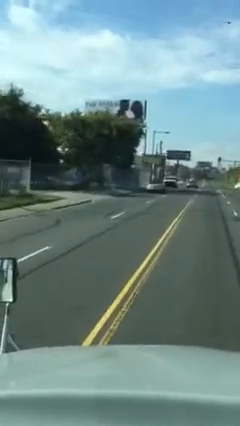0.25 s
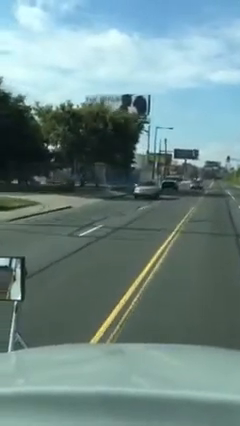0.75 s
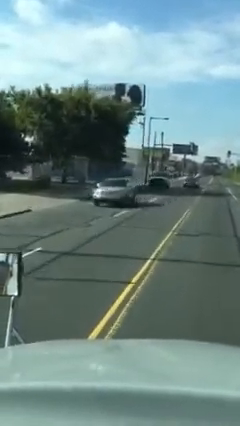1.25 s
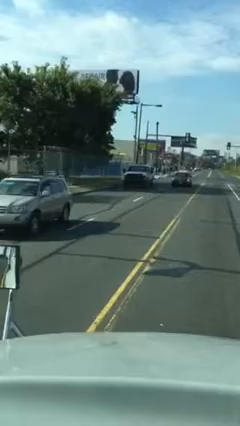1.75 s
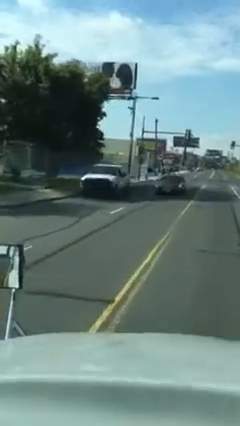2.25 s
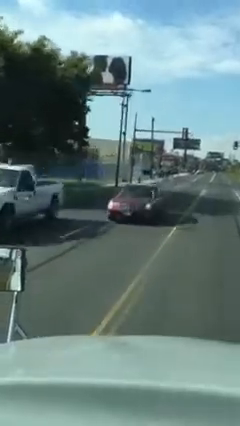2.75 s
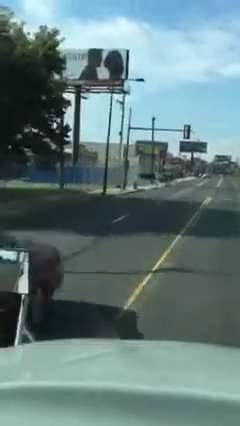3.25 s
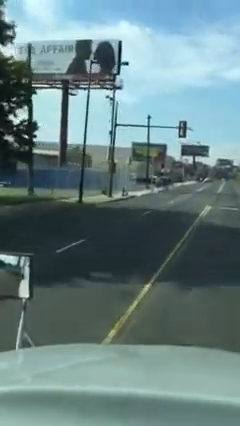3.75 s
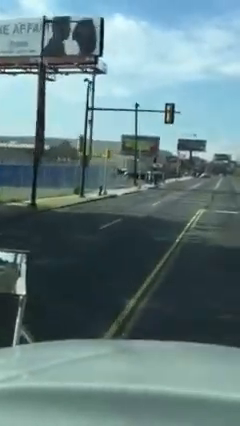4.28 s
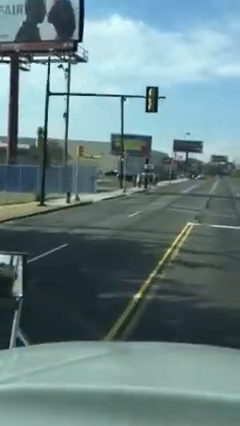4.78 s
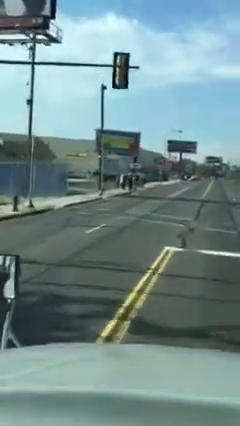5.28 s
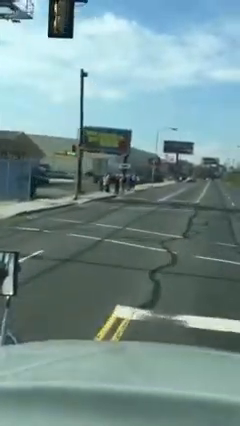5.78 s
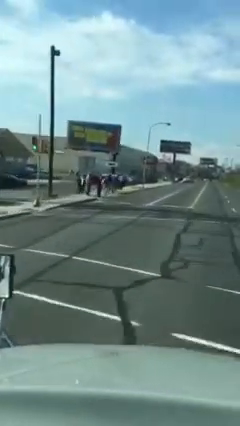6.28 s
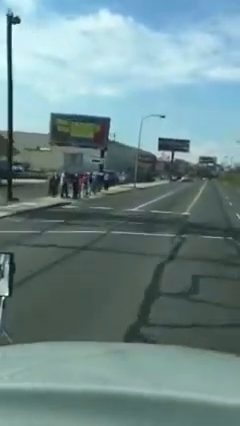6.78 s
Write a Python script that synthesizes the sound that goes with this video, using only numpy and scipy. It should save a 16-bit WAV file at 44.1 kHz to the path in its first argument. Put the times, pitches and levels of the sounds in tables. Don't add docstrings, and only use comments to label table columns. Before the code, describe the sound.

A microphone in the cab picks up a throbbing low rumble, engine hum and irregular dull thuds from the road. A few passing cars bring short bright whooshes and tyre hum, then the outside quiets, with faint whistles and chirps. Finally a single-tone air horn starts with a rasp, drops quickly onto its pitch and blares steadily, buzzing and shimmering as buildings and poles reflect it, still sounding at the cut-off.

```python
import sys
import numpy as np
from scipy import signal
from scipy.fft import rfft, irfft, next_fast_len
from scipy.io import wavfile

SR = 44100
rng = np.random.default_rng(int(sys.argv[2]) if len(sys.argv) > 2 else 0)


def gain_from_decibels(decibels):
    exponent = np.asarray(decibels, float) / 20
    return 10 ** exponent


def generate_wav(signal):
    frames = np.transpose(np.atleast_2d(signal))
    scaled = np.clip(frames, -1, 1) * 32767
    pcm = np.round(scaled).astype(np.int16)
    wavfile.write(sys.argv[1], SR, pcm)


N = 310023

# time in seconds, level in dB over the usual.
NEARNESS = [(0.0, -1.5), (0.2, -2.5), (1.4, 0), (2.3, 2), (2.55, 7.5), (2.8, 3.5), (2.95, 5), (3.35, 2),
            (3.58, 10.5), (3.75, 5), (4.1, -3.5), (4.35, -5), (4.65, -2.8), (5.45, -2)]
# time in seconds, level in dB over the usual.
SHAKING = [(0.0, -0.5), (0.2, 0), (0.6, -1), (1.2, 0), (1.9, 0), (2.5, -3), (2.9, 4.5), (3.15, -0.5),
           (3.5, -1), (3.9, -0.5), (4.5, -0.5), (5.05, -0.5), (5.4, 3), (5.6, -2), (6.1, -2), (6.7, -2.5),
           (7.03, -0.5)]
# frequency in Hz, density in dB per Hz.
BODY = [(13, -40), (22, -13), (54, -6), (75, -0.5), (105, -7.5), (140, -29), (230, -120)]
CAB = [(56, -33), (95, -14.5), (103, -5), (123, -2), (140, -1), (177, -6.5), (210, -12), (248, -12),
       (306, -10), (360, -22), (470, -53.5), (790, -120)]
TYRES = [(200, -33), (340, -13), (416, -6.5), (450, -10.5), (550, -0.5), (595, -6.5), (728, -7), (794, -7),
         (926, -8), (1260, -14), (1440, -10), (1570, -15.5), (2040, -15.5), (2520, -20.5), (3400, -29),
         (4420, -42.5), (7480, -120)]
WIND = [(1880, -40), (3200, -5), (3440, 1.5), (4910, -6.5), (6510, -8.5), (7420, -16.5), (9160, -15.5),
        (10500, -24.5), (11400, -24), (15400, -35)]
# frequency in Hz, density in dB per Hz.
MIC_HISS = [(8000, -12), (11000, 0), (15500, -3)]
# time in seconds, sixth crank order in Hz, its level in dB.
ENGINE = [(0, 136, -30.5), (1.5, 135, -32.5), (3.0, 134, -30), (4.2, 132, -31), (5.4, 126, -32),
          (7.03, 124, -31.5)]
# multiple of crank speed, level in dB.
CRANK_ORDERS = [(2, -5.5), (3, -8.5), (4, -9.5), (5, -8), (6, -0.5), (7.5, -6.5), (12, -9.5)]
# centre in Hz, width in Hz, level in dB at first,
# level in dB once the traffic is past.
WHISTLES = [
    (2000, 70, -55, -55),
    (4450, 220, -76, -68),
    (5550, 110, -86, -76),
    (6700, 160, -86, -78),
]
WHISTLES_GROW_S = (3.8, 4)
# time in seconds, peak in dB, ringing in Hz.
JOLTS = [(0.151, -25, 68), (0.85, -19.5, 137), (1.17, -21, 72), (1.391, -23, 141), (1.613, -19, 135),
         (2.186, -18, 135), (2.461, -16.5, 134), (2.539, -25, 72), (2.718, -23, 69), (2.74, -21, 140),
         (1.8, -26, 145), (2.861, -18, 134), (3.72, -22, 71), (3.794, -15, 127), (4.23, -21, 73),
         (4.745, -14.5, 131), (5.03, -18.5, 68.5), (5.329, -18.5, 75), (6.018, -23, 127), (6.711, -26, 86)]
# start in seconds, pitch in Hz, length in seconds, level in dB.
SQUEAKS = [
    (3.687, 11200, .045, -66),
    (3.815, 11050, .045, -67),
    (4.015, 10700, .03, -76),
    (4.42, 6750, .03, -63),
    (4.415, 3420, .025, -46),
    (5.055, 4450, .025, -60),
    (4.86, 5560, .025, -65),
    (2.95, 6400, .02, -63),
    (1.56, 13800, .02, -76),
]
# time abreast in seconds, swish in dB, swish width in seconds, tyre hum in dB,
# hum lag in seconds.
PASSES = [
    (2.56, -59, 0.089, -41, .05),
    (2.95, -71, .05, -50.5, .05),
    (3.3, -71, 0.089, -52.5, .05),
    (3.54, -55, 0.068, -33, 0.09),
]
# frequency in Hz, density in dB per Hz.
SWISH = [(1800, -15.5), (3000, 1.5), (4500, -12), (7000, -3.5), (10000, -11.5), (13000, -11), (15600, -20)]
HUM = [(700, -27), (1000, -5), (1350, -1), (1650, -8.5), (2400, -28)]
# time in seconds, pitch above the note in percent, level in dB.
HORN = [
    (5.457, 2.2, -66),
    (5.464, 1.7, -30),
    (5.48, 1.0, -29),
    (5.497, .4, -23.5),
    (5.56, 0, -25.5),
    (6.0, 0, -24.5),
    (6.5, 0, -24.5),
    (7.03, 0, -26),
]
# multiple of the note, level in dB.
HORN_ORDERS = [(1, -3.5), (2, -2.5), (3, 1.5), (4, 2.5), (5, -4.5), (6, -13), (7, -13.5), (8, -16),
               (9, -17.5), (10, -17.5), (11, -20.5), (12, -24), (13, -22), (14, -19), (15, -25.5),
               (16, -19.5), (17, -24.5), (18, -29.5), (19, -30), (20, -33.5), (21, -30), (22, -35.5),
               (23, -33), (24, -32.5), (25, -43), (26, -48.5), (27, -33), (28, -38), (29, -33), (30, -45),
               (31, -37)]
# multiple of the note, level
# between swells in dB over its usual.
IN_CAB = [(4, -0.5), (5, -0.5), (6, -1.5), (7, -6.5), (8, 0.4), (9, -4), (10, -1.7), (11, -0.5), (14, -2.3),
          (16, -1.4)]
# time in seconds, multiple of the note,
# lift in dB, width in seconds.
SWELLS = [(5.5, 4, 2.5, 0.02), (11, 4, 19, 0.039), (6.09, 4, -6, 0.27), (7.6, 4, 4, 0.052),
          (6.66, 4, 2.5, .06), (7.0, 4, 0, 0.043), (5.55, 5, 2.5, 0.089), (6.33, 5, -9, 0.055),
          (5.6, 11, 9, 0.04), (5.8, 5, -9, 0.046), (5.6, 9, 9.5, 0.19), (5.63, 6, 10.5, 0.13),
          (6.05, 6, -8, .06), (6.32, 6, -16, .06), (6.68, 6, 8.5, 0.073), (6.9, 6, -12, 0.16),
          (5.6, 7, -6, 0.091), (6.0, 7, 15, 0.039), (6.42, 7, -18, .1), (6.6, 7, 13, .05),
          (6.8, 7, 14, .06), (6.98, 7, 15.5, 0.084), (5.75, 8, -9, .14), (6.65, 8, 4.5, .12),
          (6.3, 10, 8.5, 0.11), (6.72, 10, 9, .06), (5.74, 14, 9, 0.044), (6.28, 14, 7, .05),
          (4.1, 14, 25, 0.055), (6.5, 16, 7.5, 0.083)]
# frequency in Hz, gain in dB.
BESIDE_COLOUR = [(300, -17), (800, -9), (1200, -5), (1600, -4), (2000, 0), (2500, 5), (3200, 4),
                 (4000, 5.5), (6000, 4.5), (9000, 12.5), (16000, 7)]
BEHIND_COLOUR = [(300, -27), (800, -32), (1200, -14.5), (1570, 4.5), (2000, 0.5), (2500, -9), (3200, -22),
                 (4000, -1), (8000, 13), (16000, -13)]
# frequency in Hz, density in dB per Hz.
AIR = [(2200, -36), (3200, -18), (4500, -2), (6000, 5), (10000, -20), (13000, -17), (16000, -13)]
SPIT = [(700, -15), (1200, -10), (3000, 10), (5000, -11), (9000, -28)]
# frequency in Hz, gain in dB.
DUCKED = [(100, -3), (700, -3), (1300, -6), (1800, -13), (16000, -13)]

NOTE_HZ, SHAKE_HZ = 413.55, 20.6
SPEED_M_S, SOUND_M_S = 11.6, 343
HORN_START = round(HORN[0][0] * SR)


def rms_one(x):
    return x / np.sqrt(np.mean(x ** 2) + 1e-20)


def in_time(rows):
    s, *columns = np.transpose(rows)
    return [np.interp(np.arange(N) / SR, s, c) for c in columns]


def colour(x, points, outside_db=-90):
    size = next_fast_len(len(x) + 4096)
    hz, db = np.transpose(points)
    log_hz = np.log(np.maximum(np.arange(size // 2 + 1) * SR / size, 1))
    gain = gain_from_decibels(np.interp(log_hz, np.log(hz), db, outside_db, outside_db))
    return irfft(rfft(x, size) * gain, size)[:len(x)]


def drift(rate, size=N):
    r = np.exp(-80 * np.pi * rate / SR)
    slow = signal.lfilter([1], [1, -2 * r, r * r], rng.standard_normal(size // 40 + 2002))[2000:]
    return np.interp(np.arange(size) / 40, np.arange(len(slow)), rms_one(slow))


def noise(points, lumps_db, lump_rate):
    return rms_one(colour(rng.standard_normal(N) * gain_from_decibels(lumps_db * drift(lump_rate)), points))


def boom():
    shaking_db, = in_time(SHAKING)
    throb_turns = np.cumsum(14.9 * (1 + .06 * drift(1.42))) / SR
    throb_db = 1.6 * np.sin(2 * np.pi * throb_turns)
    body = gain_from_decibels(-31.5 + 0.75 * shaking_db) * noise(BODY, 0.76, 7.9)
    return body + gain_from_decibels(-27.5 + 0.73 * shaking_db + throb_db) * noise(CAB, 1.15, 12.6)


def engine():
    sixth_hz, level_db = in_time(ENGINE)
    turns = np.cumsum(sixth_hz / 6 * (1 + 0.00417 * drift(3.5))) / SR
    out = np.zeros(N)
    for k, db in CRANK_ORDERS:
        level = gain_from_decibels(level_db + db + 1.24 * drift(4.6))
        out += level * np.sin(2 * np.pi * (k * turns + rng.random()))
    return out


def tyres_and_wind():
    near_db, = in_time(NEARNESS)
    roar = gain_from_decibels(-34 + 0.18 * near_db) * noise(TYRES, 0.91, 22.0)
    return roar + gain_from_decibels(-57 + near_db) * noise(WIND, 1.0, 20.0)


def whistles():
    t = np.arange(N) / SR
    out = np.zeros(N)
    for hz, width, first_db, later_db in WHISTLES:
        level = gain_from_decibels(np.interp(t, WHISTLES_GROW_S, [first_db, later_db]))
        band = [(hz - 2 * width, -20), (hz, 0), (hz + 2 * width, -20)]
        out += level * noise(band, 4.0, 16.0)
    return out


def mic_hiss():
    return gain_from_decibels(-84) * noise(MIC_HISS, .6, 9.0)


def jolts():
    out = np.zeros(N + SR)
    for s, db, hz in JOLTS:
        cycles = np.arange(SR // 4) / SR * hz
        rise = cycles / 1.06
        thump = rise * np.exp(1 - rise) * np.sin(2 * np.pi * cycles)
        out[round(s * SR):][:SR // 4] += gain_from_decibels(db) * thump
    return out[:N]


def squeaks():
    out, flutter = np.zeros(N), drift(90.0)
    for s, hz, length, db in SQUEAKS:
        i, t = round(s * SR), np.arange(round(length * SR)) / SR
        end = i + len(t)
        shape = np.sqrt(np.sin(np.pi * t / length)) * gain_from_decibels(db + 6.0 * flutter[i:end])
        wobble = 1.3 * flutter[i + 900:end + 900]
        out[i:end] += shape * np.sin(2 * np.pi * hz * t * (1 - .15 * t) + wobble)
    return out


def passes():
    t = np.arange(N) / SR
    swish, hum = np.zeros((2, N))
    for s, swish_db, width, hum_db, lag in PASSES:
        swish += gain_from_decibels(swish_db) / (1 + ((t - s) / width) ** 2)
        hum += gain_from_decibels(hum_db) / (1 + ((t - s - lag) / (1.44 * width)) ** 2)
    return swish * noise(SWISH, 0.94, 20.0) + hum * noise(HUM, 0.96, 26.0)


def swelling(multiple, t):
    lift_db = dict(IN_CAB)[multiple]
    for s, k, db, width in SWELLS:
        if round(k) == multiple:
            lift_db = lift_db + db * np.exp(-((t - s) / width) ** 2)
    return lift_db


def horn():
    sharp, blow_db = (c[HORN_START:] for c in in_time(HORN))
    size = len(sharp)
    t = np.arange(HORN_START, N) / SR
    turns = np.cumsum(NOTE_HZ * (1 + sharp / 100)) / SR
    shake = 2 * np.pi * SHAKE_HZ * np.arange(size) / SR
    opening = np.clip(np.arange(size) / (0.016 * SR), 0, 1)
    last, last_db = HORN_ORDERS[-1]
    orders = list(HORN_ORDERS) + [(last + k, last_db - .4 * k) for k in range(1, 8)]
    steady, fading = np.zeros((2, size))
    for k, db in orders:
        phase = 2 * np.pi * k * turns - .5 * k * k + np.pi / 2
        steady += gain_from_decibels(blow_db + db) * np.sqrt(2) * np.sin(phase)
        lift_db = min(.2 + .3 * k, 3) * drift(12.0, size)
        if k in dict(IN_CAB):
            lift_db = .3 * lift_db + swelling(k, t)
        heard_db = blow_db + db + lift_db - 0.32 * max(k - 17, 0)
        shaken = np.sin(phase + 0.083 * min(k, 4) * np.sin(shake))
        shaken *= 1 + 0.12 * np.cos(shake + 1.28 * k)
        fading += opening ** (1 + .03 * k) * gain_from_decibels(heard_db) * np.sqrt(2) * shaken
    return steady, fading


def street(steady, count=56):
    size = len(steady)
    t = np.arange(size) / SR
    beside, behind = np.zeros((2, size))
    for across, out_to in rng.random((count, 2)):
        ahead_m = -16 + 44 * across - SPEED_M_S * t
        r = np.hypot(ahead_m, 6.0 + 15 * out_to)
        glitter = gain_from_decibels(4.7 * drift(12.0, size))
        facing = 1 / (1 + np.maximum(ahead_m, 0) / 5.0)
        beside += np.interp(t - 2 * r / SOUND_M_S, t, steady, 0) * (12 / r) ** 1.1 * glitter * facing
    for far_m, share in ((14, .71), (23, .74), (35, .8)):
        sway_m = 0.013 * drift(3.5, size)
        lag = 2 * (far_m + share * SPEED_M_S * t + sway_m) / SOUND_M_S
        behind += np.interp(t - lag, t, steady, 0) * gain_from_decibels(-23.5 + 5.1 * drift(11.0, size))
    return colour(beside, BESIDE_COLOUR) * gain_from_decibels(-5) / np.sqrt(count) + colour(behind, BEHIND_COLOUR)


def air_leak():
    leaking = np.clip((np.arange(N) - HORN_START) / (.012 * SR), 0, 1)
    return leaking ** 2 * gain_from_decibels(-45.5) * noise(AIR, 0.74, 35.0)


def spit():
    t = np.arange(N) / SR - 5.462
    shape = np.clip(t / .004, 0, 1) * np.exp(-np.maximum(t, 0) / .022)
    return gain_from_decibels(-35) * shape * noise(SPIT, 3.0, 80.0)


def scene():
    blowing = np.clip((np.arange(N) - HORN_START) / (0.045 * SR), 0, 1)
    outside = tyres_and_wind()
    out = boom() + engine() + mic_hiss() + jolts() + squeaks() + passes()
    out += (outside + whistles()) * (1 - blowing) + colour(outside, DUCKED) * blowing
    steady, fading = horn()
    out[HORN_START:] += fading + street(steady)
    out += air_leak() + spit()
    return out[None]


def roll_off(x):
    return signal.sosfilt(signal.butter(12, 15730, fs=SR, output="sos"), x)


def record(dry):
    t = np.arange(N) / SR - round(1.8037 * SR) / SR
    step = gain_from_decibels(-24) * np.where(t < 0, -1, 1) * np.exp(-np.abs(t) / .0006)
    low_pass = signal.ellip(12, .1, 50, 15280, fs=SR, output="sos")
    return roll_off(signal.sosfiltfilt(low_pass, dry) + step)


dry = scene()
out = record(dry)
generate_wav(out)
```